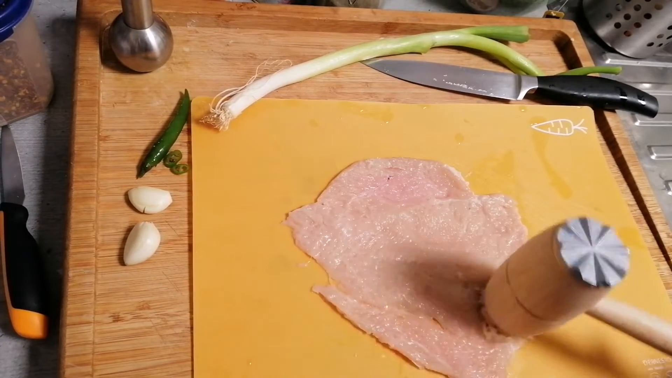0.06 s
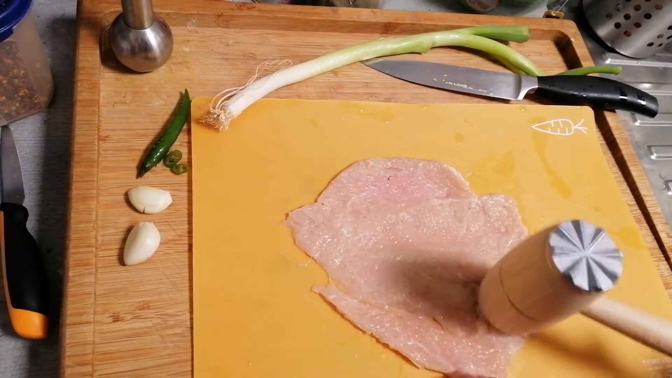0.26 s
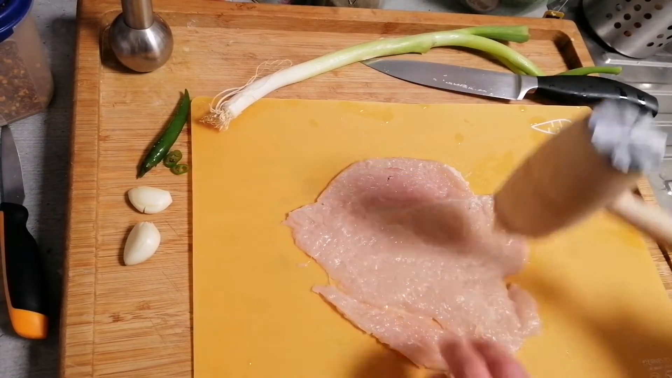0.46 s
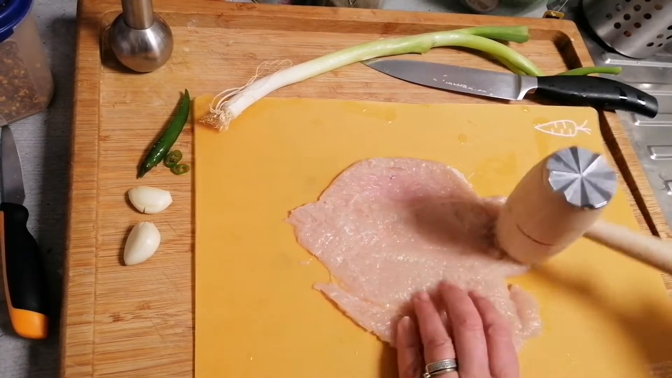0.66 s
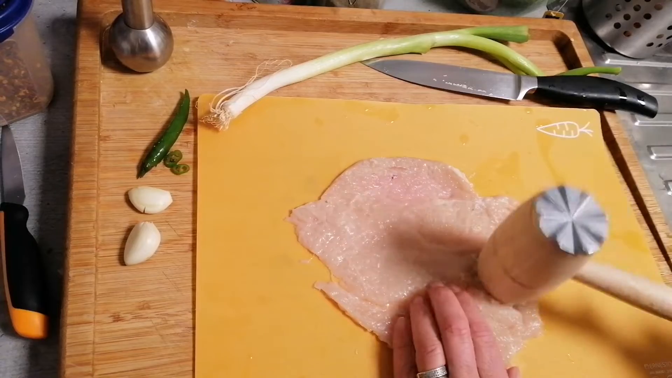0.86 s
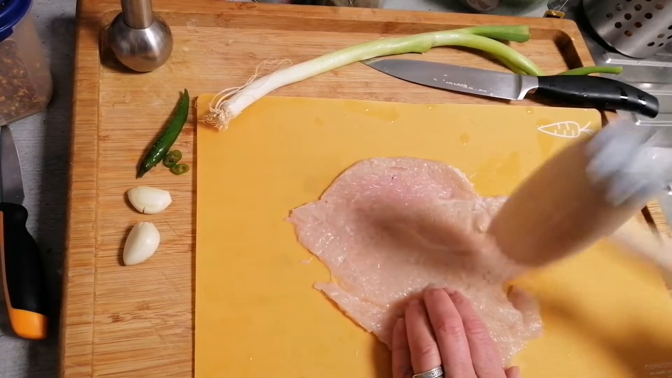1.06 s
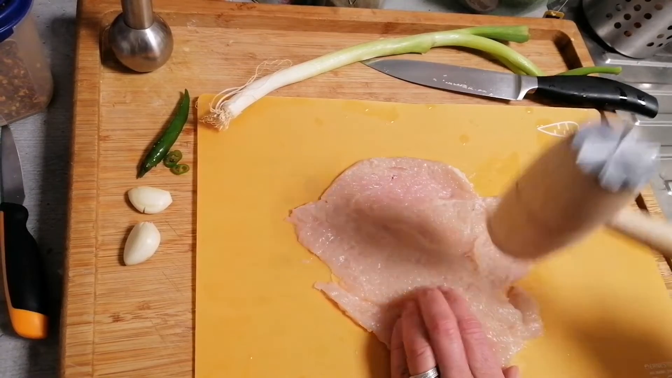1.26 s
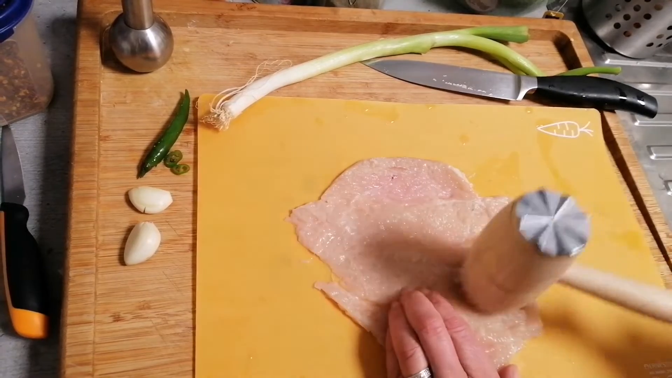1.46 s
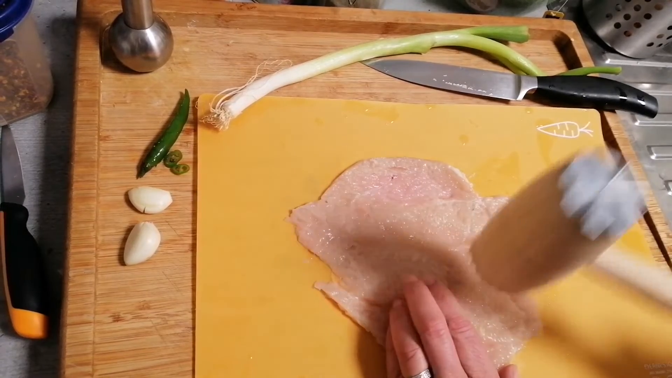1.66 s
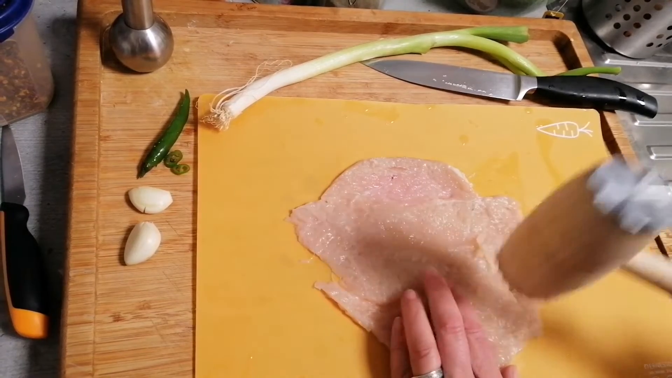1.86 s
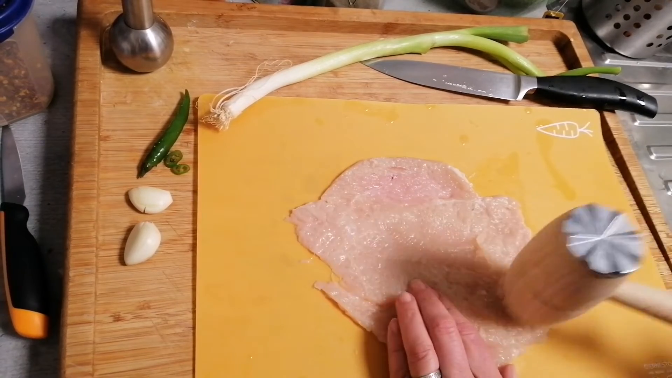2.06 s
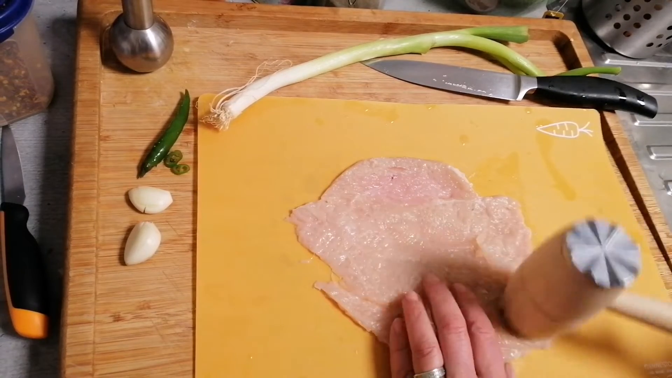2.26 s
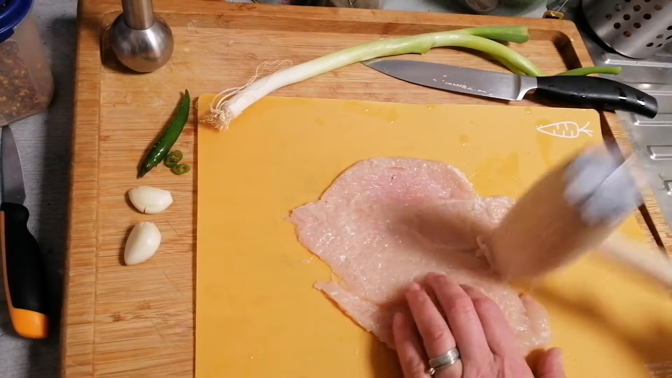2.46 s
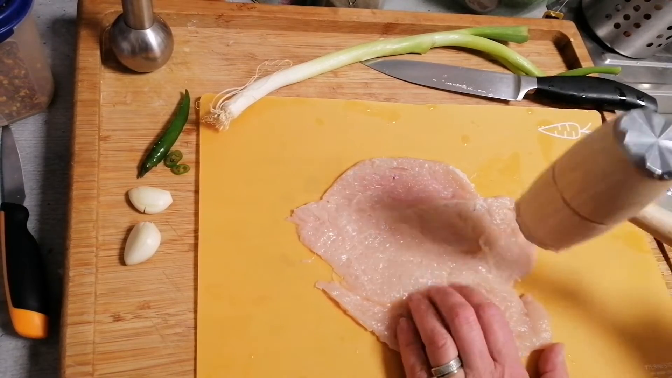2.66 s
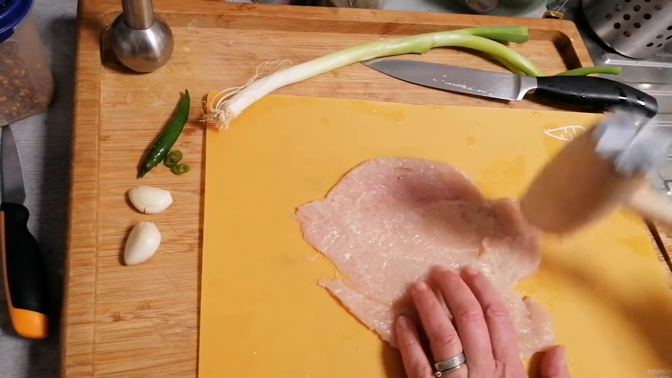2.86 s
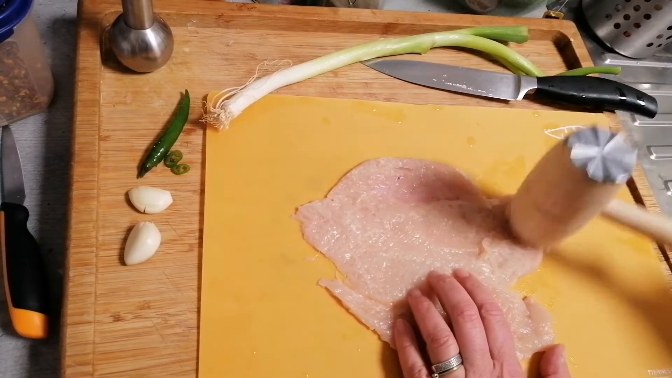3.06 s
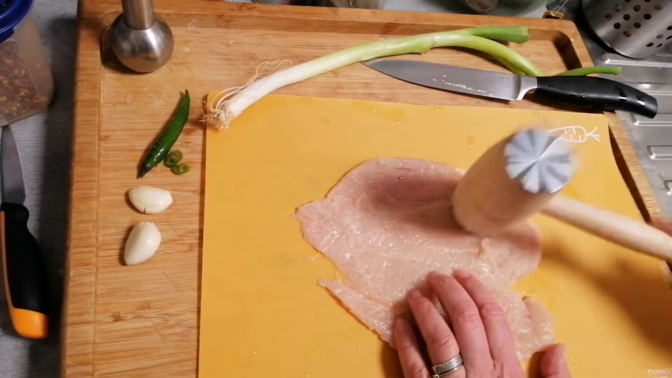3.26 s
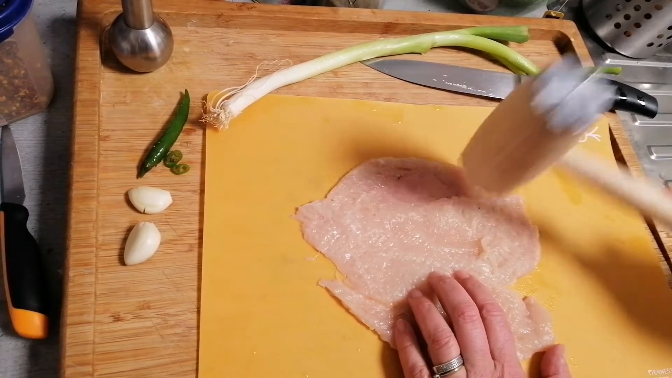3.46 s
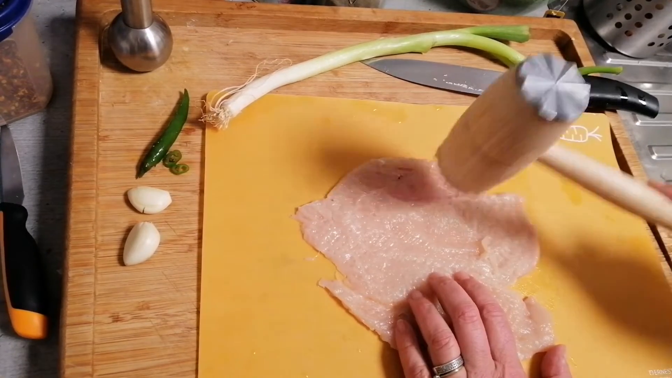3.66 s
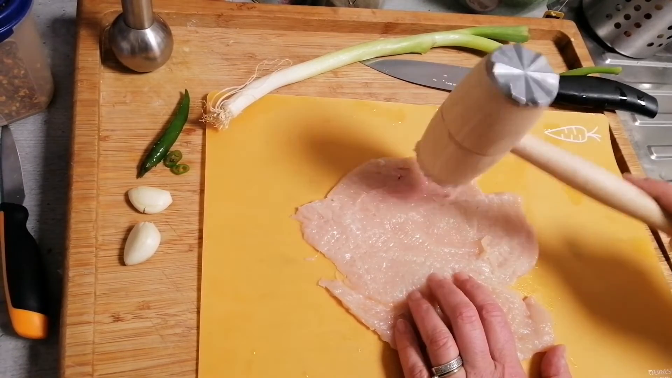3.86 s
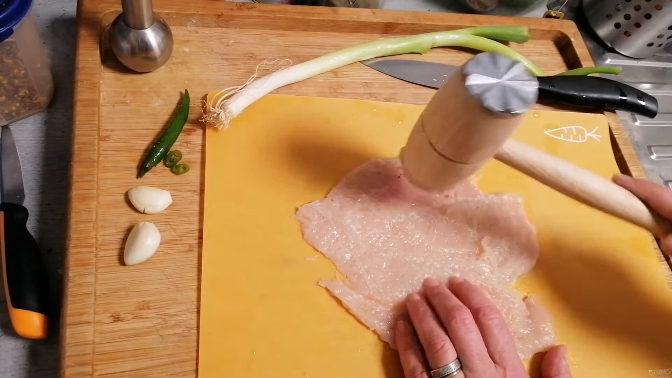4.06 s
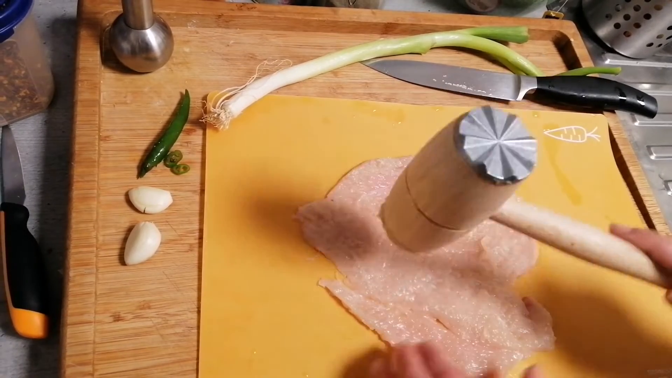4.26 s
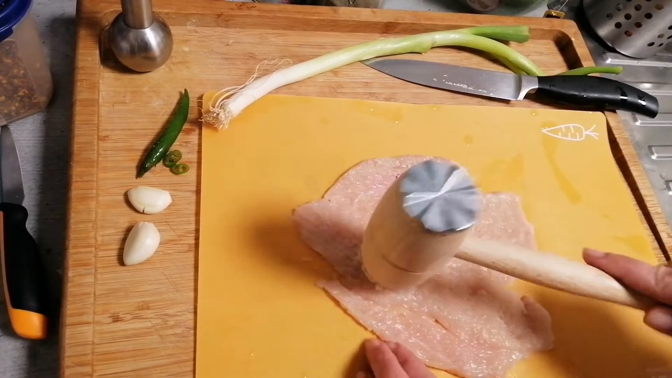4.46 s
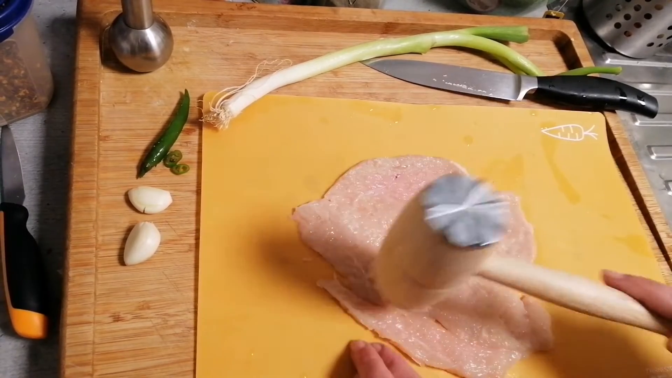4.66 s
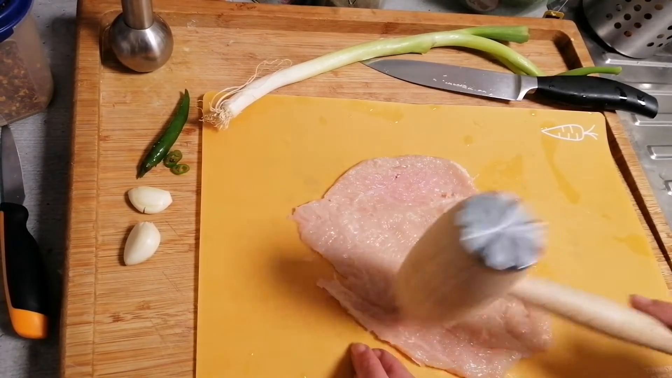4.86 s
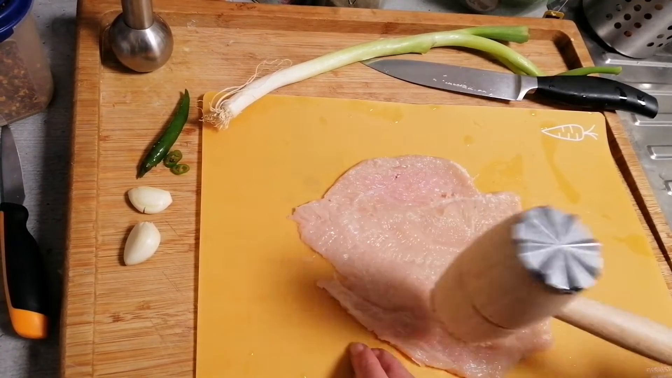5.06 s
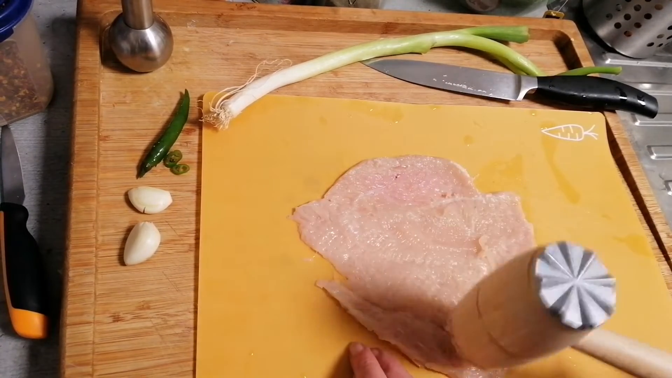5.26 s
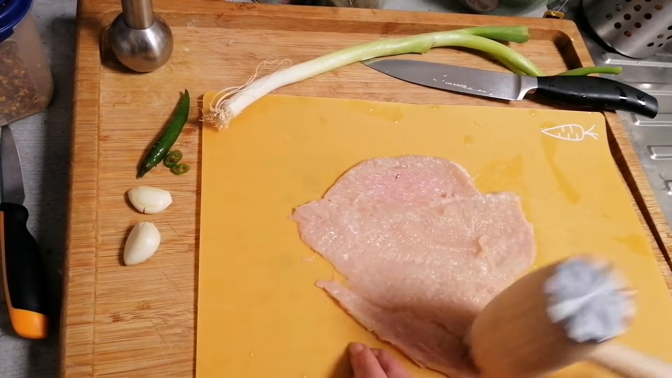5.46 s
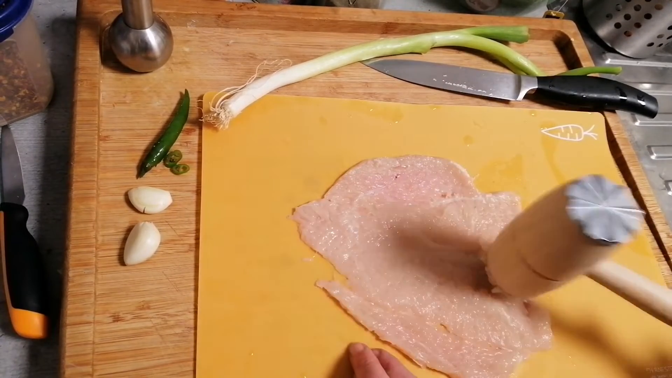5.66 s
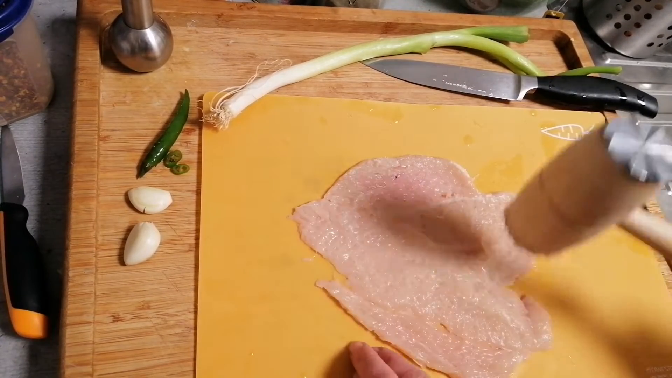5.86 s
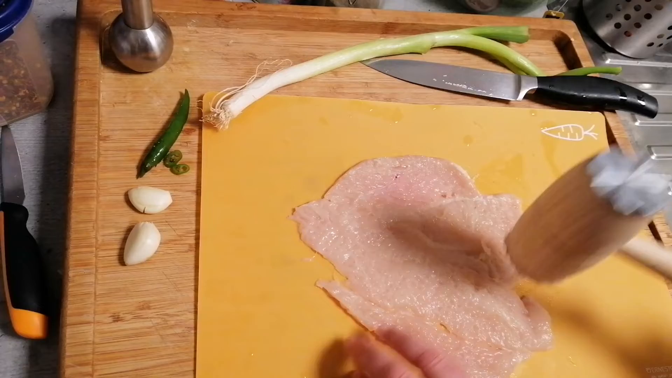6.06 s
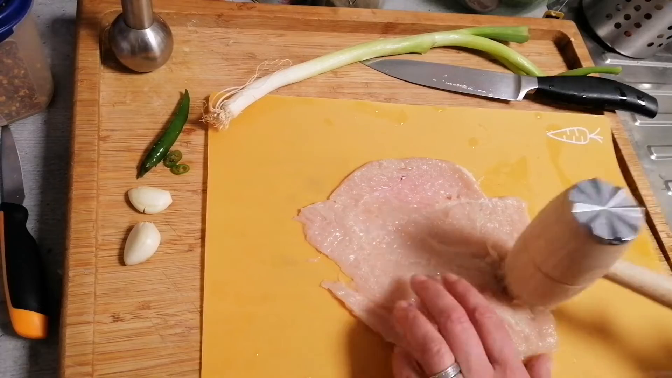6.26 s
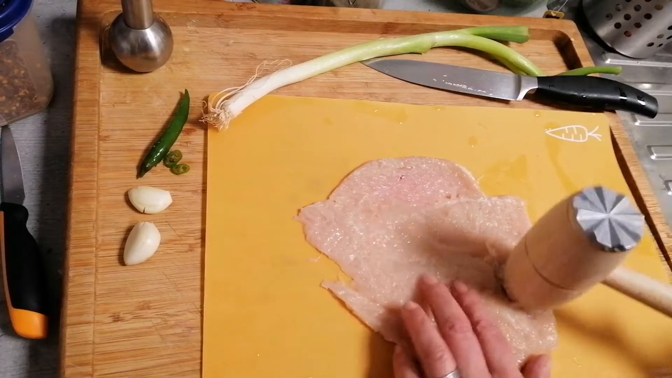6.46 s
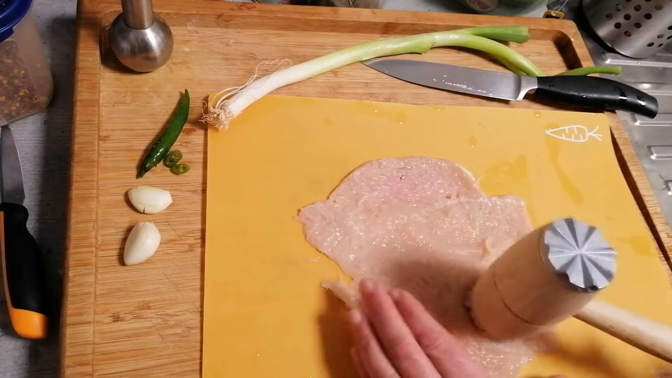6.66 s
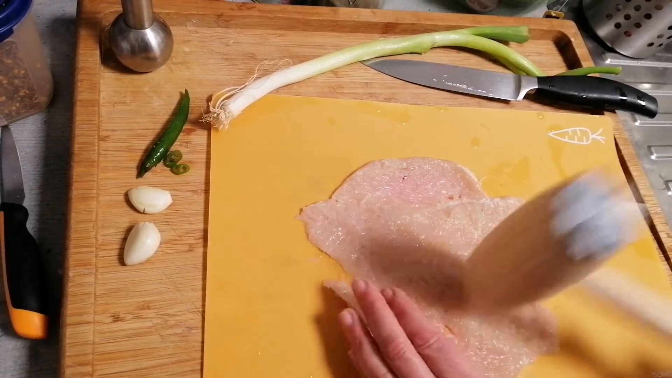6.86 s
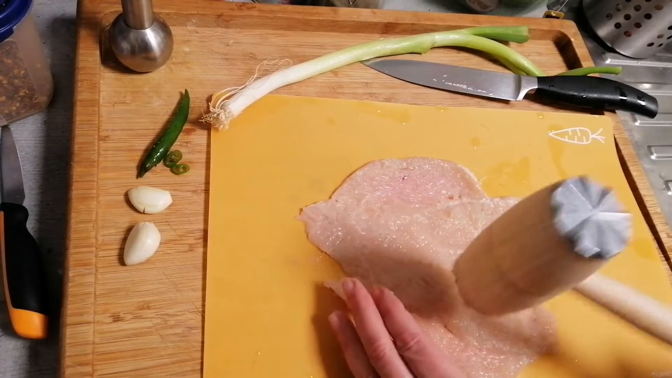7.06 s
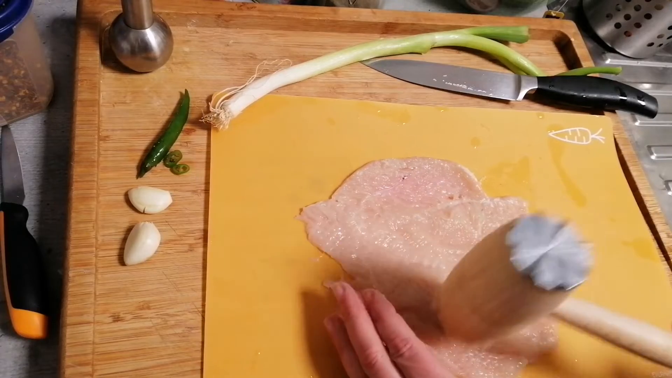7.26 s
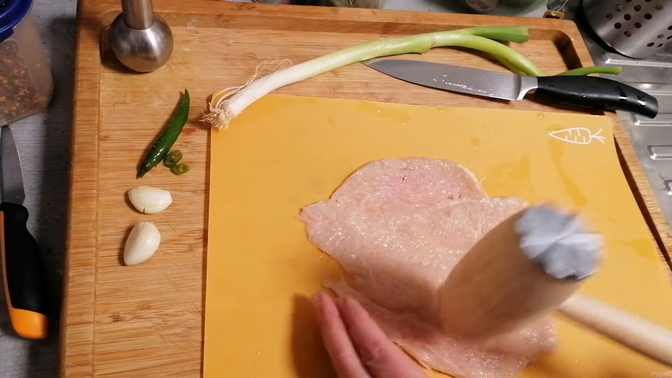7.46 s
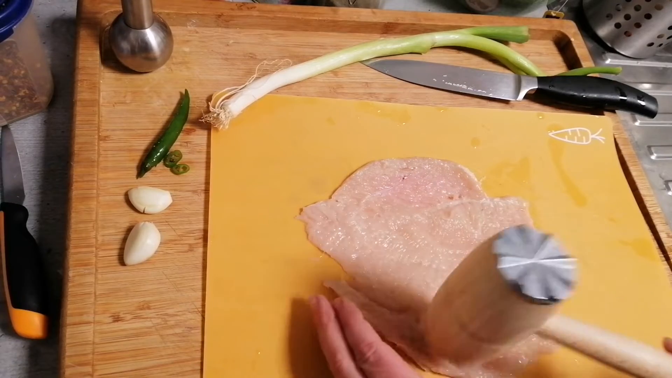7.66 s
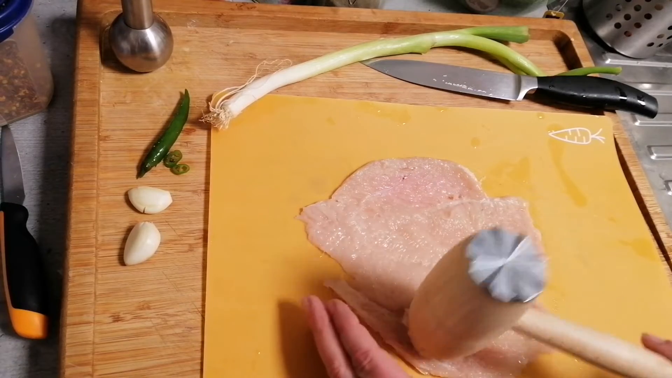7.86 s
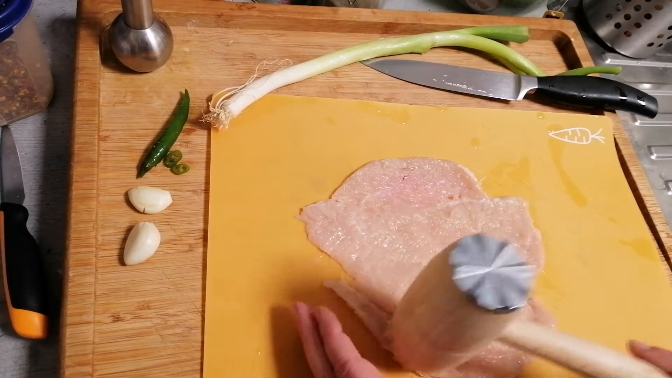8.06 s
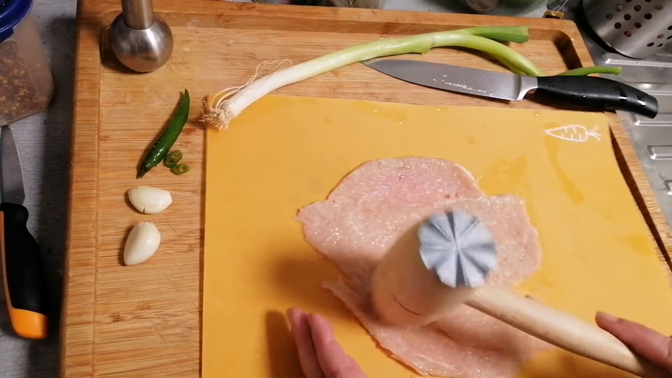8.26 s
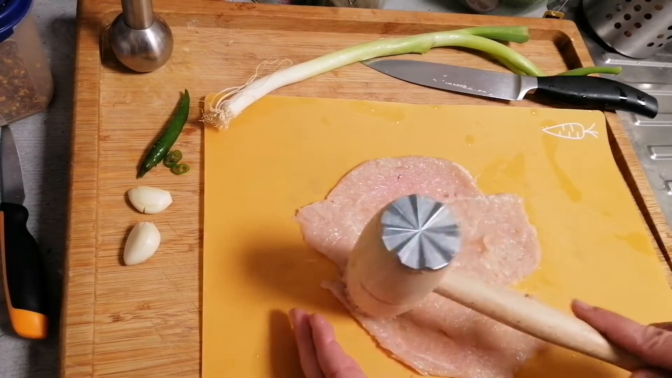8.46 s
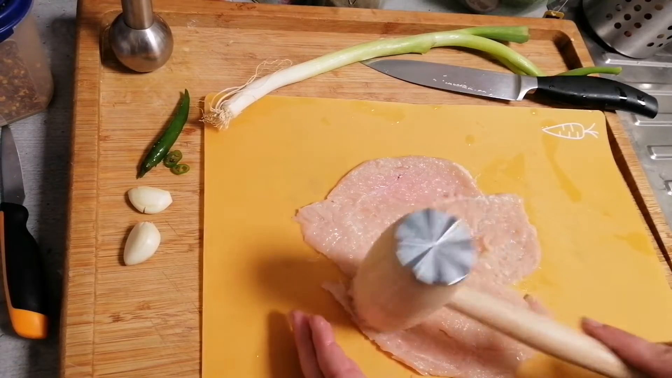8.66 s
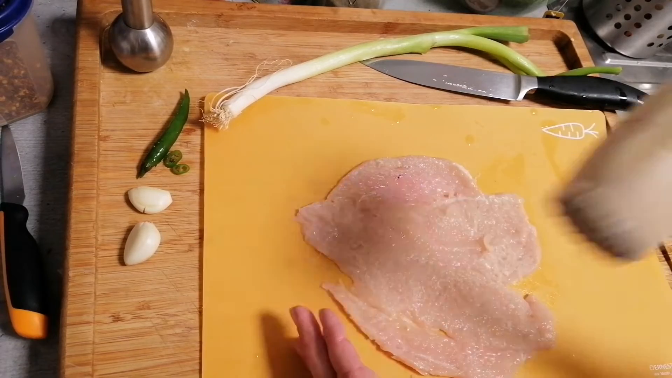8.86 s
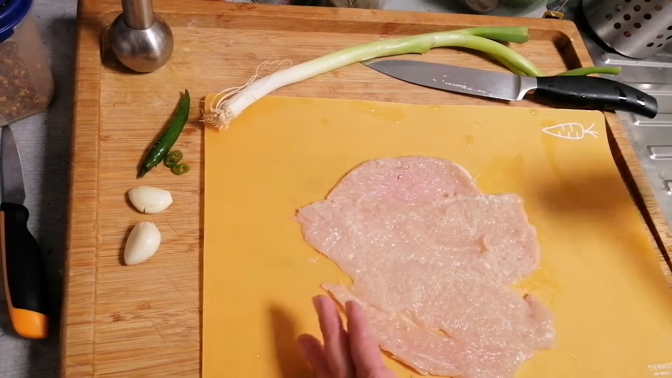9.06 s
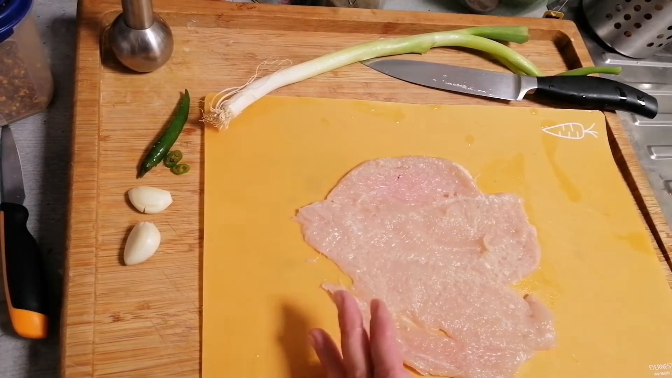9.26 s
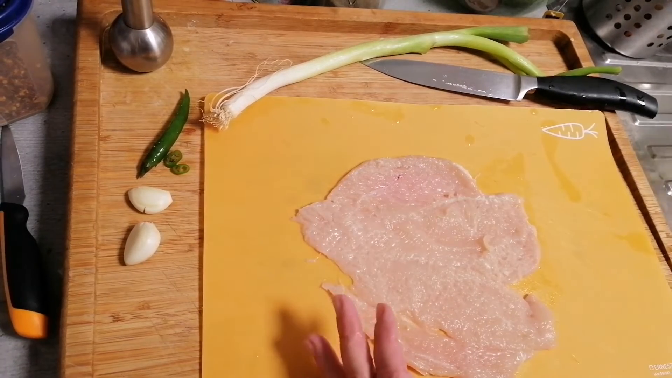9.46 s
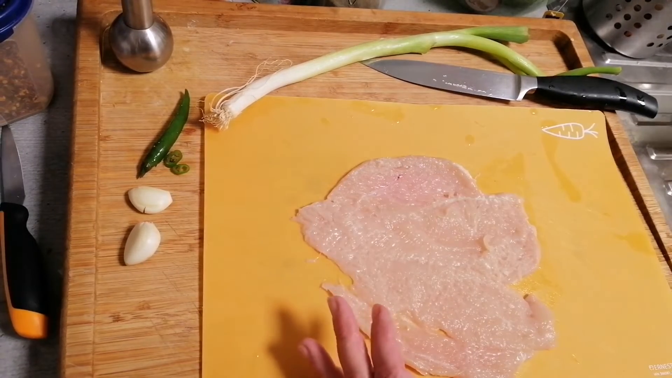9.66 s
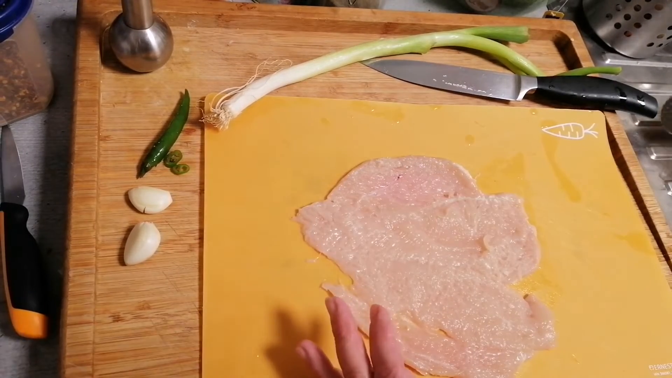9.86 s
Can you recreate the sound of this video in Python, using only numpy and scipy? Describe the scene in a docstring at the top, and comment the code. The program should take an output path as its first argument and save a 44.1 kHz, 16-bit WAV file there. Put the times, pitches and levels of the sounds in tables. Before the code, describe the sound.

The fading tail of an earlier blow opens, then a wooden mallet pounds raw meat on a plastic mat over a wooden board, about four to five blows per second. Each is a wet slap with a hollow pop, a deep short thud and a small sticky tick as the mallet lifts. After the last blow, fingertips faintly rub the mat. Close stereo microphones, leaning right, in a small reflective kitchen with faint hiss and hum.

```python
"""A wooden mallet pounds a chicken breast on a plastic mat over a wooden board in a small kitchen.
At the opening the board and room still carry an earlier blow, as decaying modes and filtered noise.
Then each blow is a noise-burst slap with a hollow pop of trapped air, over modal thuds of board and room.
After each blow the mallet peels off with a small sticky tick; at the end fingers slide over the mat.
Wall echoes follow the contact sounds; faint hiss and an appliance hum run throughout."""
import sys
import numpy as np
from scipy import signal
from scipy.fft import rfft, irfft, next_fast_len
from scipy.io import wavfile

SR = 44100
rng = np.random.default_rng(int(sys.argv[2]) if len(sys.argv) > 2 else 0)


def unload_wav(signal):
    """Save mono or channel-first audio to the path in sys.argv[1] as 16-bit WAV at rate SR, clipped to [-1, 1]."""
    wavfile.write(
        sys.argv[1],
        SR,
        np.round(np.clip(np.atleast_2d(signal).T, -1, 1) * 32767).astype(np.int16),
    )


N = 437897
T = np.arange(N) / SR

# mallet blows, levels relative to a usual blow:
# start_s, force_db, trapped_air_db, juice_db, fine_spray_db, squirt_hz
BLOWS = [(0.122, -2, -5, -5.5, 0.0, 6500), (0.333, 2, -2, -3.5, -6, 2510),
         (0.697, -3.5, 5, 1.5, -3.5, 2150.0), (0.955, 1.5, -1.5, 2, -2, 2280),
         (1.198, 5, 12.5, 8.5, 1.5, 2500), (1.511, 0, 2.5, 4, 1, 7840), (1.777, 1.5, 6, 8, 3, 2400),
         (2.044, 1, 6.5, 10, 6, 4000), (2.293, 4.0, 2.0, -3, -1.5, 4900), (2.567, -1.5, 8, 3, -4.0, 3650),
         (2.823, -0.5, 6, 1.5, -4.5, 3340), (3.083, 1.5, 7.5, -5.5, -1.5, 6600),
         (3.359, -1, 4, 5.5, -1.0, 5950.0), (3.586, -2, 1.5, 0, 0.5, 5770),
         (3.813, -4, 8, -1.5, -0.5, 2090.0), (4.021, -3, -0.5, 4.5, 5, 3770),
         (4.437, 1.5, 4, 1.5, 2.5, 5800), (4.619, 1, 3.5, 0, 4, 5700), (4.816, 0, -3.5, -2, -4.5, 5400),
         (5.016, -4, -12, 0.5, 1, 7050), (5.207, -3.5, 2, 10.5, 5, 6940), (5.389, -7, 4, 1.0, 6, 6580.0),
         (5.574, -2, 1, -4.5, -3, 5400), (5.779, -6, -1.5, -4, -7, 4180), (6.038, -2.0, 6.5, 3.5, -4, 2100),
         (6.273, 1, 3.5, -1, -4.5, 6900), (6.488, 2.5, -3, -6, -7.5, 3800.0),
         (6.741, 1, -2.5, -7, -1, 3290.0), (6.992, 0.5, 4, 3, 5, 2600), (7.218, 1, -6, -4.5, -4, 7040.0),
         (7.429, 0, -4.5, 0.5, -1.5, 7660.0), (7.646, 1.5, -4, 1.5, 2, 5300),
         (7.858, -0.5, -1, 0.5, 7.5, 5150.0), (8.069, -3, 0.5, -3.5, -6.5, 7400),
         (8.304, -1.5, -3, 2, -2, 4870), (8.494, -0.5, -1.5, 2, -4, 2690), (8.697, -0.5, 5, 5.5, 6, 7400)]
# modes of board and worktop: pitch_hz, level_db, t60_s, first_swing_sign
BOARD = [(46.18, -16, 1, -1), (66.46, -11, 0.78, 1), (91.5, -5, 0.17, 1), (131.3, 2, 0.32, -1),
         (192.5, -12.5, 0.3, -1), (242.7, -15.5, 0.17, 1), (289, -20.5, 0.26, -1), (352.8, -31, 0.1103, 1),
         (424.4, -30.5, 0.073, -1)]
# standing waves of the kitchen: pitch_hz, level_db, t60_s, first_swing_sign
BOOM = [(42.6, -10.5, 0.6, -1), (58.5, -7.5, 0.24, 1), (74.43, -20.5, 0.79, 1), (125.8, -22.5, 0.21, 1),
        (144.6, -8, 0.31, -1), (222.8, -8, 0.17, -1)]
# ways in which the sound leaves the mallet: left microphone, right microphone, then four walls
WAYS = 6


def amp(db):
    """Decibel law: level to amplitude gain."""
    return 10 ** (np.asarray(db) / 20)


def unit(x):
    """Energy normalisation: the squares sum to one."""
    return x / np.sqrt(np.sum(x ** 2, axis=-1, keepdims=True) + 1e-20)


def add(out, s, sound):
    """Superposition: mixes a sound in at time s."""
    i = max(round(s * SR), 0)
    out[..., i:i + sound.shape[-1]] += sound[..., :N - i]


def band(x, low_hz, high_hz):
    """Band-pass filtering: keeps the range between two cutoffs."""
    edges = np.clip([low_hz, high_hz], 10, .45 * SR)
    return signal.sosfilt(signal.butter(2, edges, "band", fs=SR, output="sos"), x)


def resonance(x, hz, width_hz):
    """Damped resonance: a pole pair makes one peak, wider with more damping."""
    r = np.exp(-np.pi * width_hz / SR)
    return signal.lfilter([1, 0, -1], [1, -2 * r * np.cos(2 * np.pi * hz / SR), r * r], x)


def fade(t, t60):
    """Exponential decay: falls by 60 dB in t60 seconds."""
    return amp(-60 * t / t60)


def colour(x, points, power=1):
    """Spectral shaping: filters by a (Hz, dB) curve raised to a power."""
    size = next_fast_len(x.shape[-1] + SR // 50)
    hz, db = np.transpose(points)
    bins_hz = np.arange(size // 2 + 1) * SR / size
    curve = np.interp(np.log(bins_hz + 1), np.log(hz), db)
    return irfft(rfft(x, size) * amp(curve * power), size)[..., :x.shape[-1]]


def pan(x, points):
    """Interchannel level difference: leans each frequency left or right."""
    return colour(x, points, np.array([[.5], [-.5]]))


def crush(t, peak_s, rise_s, fall_s, grain_db=-0.5, ooze_db=-23.0, ooze_s=0.0085):
    """Noise burst of tiny wet pockets: exponential rise, two-stage decay, independent in each way."""
    before = np.minimum(t - peak_s, 0)
    since = np.maximum(t - peak_s, 0)
    decay = np.exp(-since / fall_s) + amp(ooze_db) * np.exp(-since / ooze_s)
    shape = np.exp(before / rise_s) * decay
    noise = rng.standard_normal((WAYS, len(t)))
    grain = amp(grain_db * rng.standard_normal((WAYS, len(t))))
    return shape * noise * grain


def hardness(force, air):
    """Impact hardness: dB relative to a usual blow; a forceful blow on a thin spot is a hard one."""
    per_force, per_air = 1.9, 0.23   # dB per dB
    return per_force * force + per_air * air


def slaps(pop_db=-18.5, bump_db=-33.0, lead_s=.003, peak_s=.0037):
    """Impact on a wet layer: trapped air pops, the meat smacks, juice squirts and the mallet head rings."""
    out, t = np.zeros((WAYS, N)), T[:SR // 10]
    for s, force, air, juice, spray, squirt_hz in BLOWS:
        pocket_spread_octaves = .09   # the air pocket is about the same size on every blow
        pocket_hz = 1154.6 * 2 ** (pocket_spread_octaves * rng.normal())
        push = crush(t, peak_s, rise_s=0.00024, fall_s=0.0015, grain_db=4.0, ooze_db=-24.5)
        bump = crush(t, peak_s, rise_s=0.00055, fall_s=0.0051)
        # long waves reach both microphones alike
        push[0], bump[0] = push[1], bump[1]
        sound = amp(pop_db + air) * hollow_pop(t, push, pocket_hz)
        # a hard blow bumps through to the mat
        sound += amp(bump_db + hardness(force, air)) * unit(band(bump, 200, 410))
        sound += wet_burst(t, peak_s, force, air, juice, spray, squirt_hz)
        add(out, s - lead_s, sound)
        add(out[:2], s, mallet_ring(t, force, air))
    return out


def hollow_pop(t, push, pocket_hz, pocket_share=0.82):
    """Cavity resonance: escaping air is coloured noise plus the ringing of the pocket."""
    # hollow colour of the escaping air: pitch_hz, level_db
    pop_curve = [(150, -28), (380, -19), (540, -12.5), (760, -3), (1150, 2), (1500, -2), (2200, -6),
                 (4000, -39)]
    return unit(unit(colour(push, pop_curve)) + pocket_share * gulp(t, pocket_hz))


def gulp(t, hz, start_s=.0018, above_octaves=.3):
    """Damped oscillation of an opening cavity: a short ring that glides down through its pitch."""
    sag_octaves, sag_s, ring_s = 1, .008, 0.0014
    t = np.maximum(t - start_s, 0)
    pitch = hz * 2 ** (above_octaves - sag_octaves * (1 - np.exp(-t / sag_s)))
    phase = 2 * np.pi * np.cumsum(pitch) / SR
    return unit(np.sin(phase) * t * np.exp(-t / ring_s))


def wet_burst(t, peak_s, force, air, juice, spray, squirt_hz, smack_db=-10.5, squelch_db=-11.5,
              spray_db=-19.0, squirt_share=0.21, squirt_width_hz=600):
    """Turbulent ejection: broadband noise with a resonant squirt, as juice and air leave the rim."""
    smack_per_air, smack_per_juice = 0.46, 0.53   # dB per dB
    # force draws the burst out, juice makes it snappier (dB of duration per dB)
    stretch_per_force, stretch_per_juice = .45, -.5
    burst_s = 0.0018 * amp(stretch_per_force * force + stretch_per_juice * juice)
    burst = crush(t, peak_s, rise_s=0.66 * burst_s, fall_s=burst_s, ooze_db=-16.0, ooze_s=.008)
    squirt = unit(resonance(burst, squirt_hz, squirt_width_hz))
    wet = unit(burst) + squirt_share * squirt
    # flat meat smacks low, juice squelches higher, the finest spray hisses on top
    smack = smack_db + smack_per_air * air + smack_per_juice * juice
    squelch, mist = squelch_db + juice, spray_db + spray
    return colour(wet, [(600, smack - 24), (1750, smack - 1), (3200, smack),
                        (5000, squelch), (7600, squelch + 1), (8700, mist),
                        (10000, mist - 1), (12000, mist - 6), (15000, mist - 11)])


def mallet_ring(t, force, air, wood_db=-25.0, per_hardness=0.3, per_air=.6, scatter_db=3.4):
    """Modal vibration: the wooden head rings as a sum of decaying sines."""
    # modes of the mallet head: pitch_hz, level_db, t60_s
    head_modes = [(662, -9, 0.19), (827, 1.5, 0.063), (1140, -1, 0.049), (1820, -10.5, 0.037),
                  (2418, -5, 0.11)]
    wood = 0
    for hz, db, t60 in head_modes:
        level = amp(db + scatter_db * rng.normal())
        swing = rng.choice([-1, 1])
        wood = wood + level * swing * np.sin(2 * np.pi * hz * t) * fade(t, t60)
    return amp(wood_db + per_hardness * hardness(force, air) + per_air * air) * unit(wood)


def thuds(thud_db=-36.5, board_db=5.5, boom_db=5.5, bass_follow=.45, scatter_db=1.5, detune=0.012,
          contact_s=0.0013, boom_lag_s=.0294):
    """Modal excitation: blows ring the board, then the room; hardness drives upper modes, the lowest vary least."""
    out, t = np.zeros(N), T[:SR]
    # the soft meat rounds off the start of the swing
    onset = 1 - np.exp(-t / 0.0016)
    for s, force, air, *_ in BLOWS:
        for modes, lag, db in (BOARD, contact_s, board_db), (BOOM, boom_lag_s, boom_db):
            for hz, level, t60, swing in modes:
                drives = [bass_follow * force, force, hardness(force, air)]
                drive = np.interp(hz, [70, 125, 210], drives) + scatter_db * rng.normal()
                pitch = hz * (1 + detune * rng.normal())
                ring = np.sin(2 * np.pi * pitch * t) * fade(t, t60) * onset
                add(out, s + lag, swing * amp(thud_db + db + level + drive) * ring)
    return out


def peels(peel_db=-40.5, fizz_db=-53.5, fizz_s=0.043):
    """Adhesive release: a band of noise ticks as the face lifts, after a faint fizz of juice."""
    # stray ticks of the wet meat settling: peak_s, level_db
    stray_ticks = [(0.227, -40.5), (0.4533, -35.5), (2.477, -50.5), (4.417, -42), (6.1938, -51),
                   (8.926, -50), (9.087, -48)]
    lift_s, lift_spread_s = 0.076, 0.0043   # from landing to lifting
    # the face sticks more after a firm blow that traps little air (dB per dB)
    stick_per_force, stick_per_air = 0.97, -0.7
    out, t = np.zeros((WAYS, N)), T[:SR // 6]
    ticks = list(stray_ticks)
    for s, force, air, _, spray, _ in BLOWS:
        tick_s = s + lift_s + lift_spread_s * rng.normal()
        ticks.append((tick_s, peel_db + stick_per_force * force + stick_per_air * air))
        fizz = crush(t, fizz_s + .008 * rng.normal(), rise_s=0.056, fall_s=0.013)
        add(out, s, amp(fizz_db + spray) * unit(band(fizz, 6500, 15500)))
    for s, db in ticks:
        tick = crush(t, 0.0086, rise_s=.003, fall_s=0.0036)
        add(out, s - .008, amp(db) * unit(band(tick, 5100, 7800)))
    return out


def fingers(grain_db=6.5):
    """Friction noise: damp fingertips rub the mat as grainy noise under bell-shaped swells."""
    # slides, length from the peak to 1/e: peak_s, length_s, level_db
    slides = [(8.949, 0.048, -78.5), (9.196, 0.048, -74.5), (9.416, 0.052, -80)]
    grains = rng.standard_normal(N) * amp(grain_db * rng.standard_normal(N))
    rub = colour(grains, [(200, -8.0), (600, -3), (1500, 3.5), (7000, 0.5), (14000, -22)])
    rub = unit(rub) * np.sqrt(N)
    return rub * sum(amp(db) * np.exp(-((T - s) / length) ** 2) for s, length, db in slides)


def dying_thud(level_db=-37.0, age_s=0.068):
    """Free modal decay: board and room still ring from an earlier blow as the scene opens."""
    t = T[:SR] + age_s
    ring = 0
    for hz, db, t60, swing in BOARD + BOOM:
        # the decay counts from half the age
        ring = ring + swing * amp(db) * np.sin(2 * np.pi * hz * t) * fade(t - age_s / 2, t60)
    opening = np.minimum(T[:SR] / .004, 1) ** 2
    return np.pad(amp(level_db) * ring * opening, (0, N - SR))


def dying_slap(level_db=-27.0, t60=0.2):
    """Reverberant decay: the room still carries the slap of that earlier blow as fading noise."""
    t = T[:SR // 2]
    opening = np.minimum(t / .004, 1) ** 2
    noise = rng.standard_normal((2, len(t)))
    tail = colour(noise, [(300, 14), (1200, 7.5), (6000, -2.5), (14000, -18)]) * fade(t, t60) * opening
    return np.pad(amp(level_db) * unit(tail), ((0, 0), (0, N - len(t))))


def kitchen(sources, early_db=-3.5, early_t60=0.035, late_db=-4.5, late_t60=0.28, gap_s=0.0053):
    """Reverberation by convolution: each wall answers with dense early echoes, then a short tail."""
    # colour of the room's echoes: pitch_hz, level_db
    echo_curve = [(150, -4.5), (350, 14.5), (600, 9), (1200, -3.5), (2500, 0.5), (4000, -3), (7000, -6),
                  (10000, -2), (14000, -9)]
    t, out = T[:SR // 2], 0
    for source in sources:
        grains = rng.standard_normal((2, len(t))) * amp(1.0 * rng.standard_normal(len(t)))
        early = unit(grains * fade(t, early_t60) * (t > gap_s))
        late = unit(rng.standard_normal((2, len(t))) * fade(t, late_t60) * (t > 2 * gap_s))
        echoes = colour(amp(early_db) * early + amp(late_db) * late, echo_curve)
        out = out + signal.oaconvolve(source[None], echoes, axes=1)[:, :N]
    return out / np.sqrt(len(sources))


def still_air(hiss_db=-77.0, hum_db=-79, hum_hz=144):
    """Stationary background: partly correlated stereo noise and the sine hum of an appliance."""
    # spectrum of the still kitchen: pitch_hz, density_db_per_hz
    air_curve = [(18, -42), (30, -9), (92, -9), (143, -3.5), (190, -8.5), (320, -10), (497, -14.5),
                 (1270, -25), (2250, -22), (4780, -32), (5730, -27.5), (8470, -38.5), (15000, -52)]
    noise = rng.standard_normal((2, N)) + rng.standard_normal(N)   # own part plus shared part
    hiss = amp(hiss_db) * unit(colour(noise, air_curve)) * np.sqrt(N)
    return hiss + amp(hum_db) * np.sqrt(2) * np.sin(2 * np.pi * hum_hz * T)


def scene():
    """Superposition of direct and reverberant fields: contact sounds and thuds, echoes and quiet."""
    # direct sound, left minus right; the mallet works nearer to the right: pitch_hz, difference_db
    direct_lean = [(100, -5), (500, -9), (1000, -7.5), (1500, -6), (2500, -9.5), (4500, -11), (7200, -5.5),
                   (9300, -2.5), (14000, 2.5)]
    # room sound, left minus right: pitch_hz, difference_db
    room_lean = [(100, -6.5), (500, -8.5), (1500, -4.5), (4000, -6.5), (7000, -11.5), (8800, 3),
                 (14000, -1.5)]
    contact = slaps() + peels() + fingers()
    direct = contact[:2] + thuds() + dying_thud()
    room = kitchen(contact[2:]) + dying_slap() + still_air()
    return pan(direct, direct_lean) + pan(room, room_lean)


def record(dry):
    """Band limiting: the deepest bass and the top are cut."""
    cutoff_hz = 15500
    dry = colour(dry, [(20, -22.5), (30, -12.5), (40, -0.5)])
    return signal.sosfilt(signal.ellip(10, .1, 80, cutoff_hz, fs=SR, output="sos"), dry)


dry = scene()
out = record(dry)
unload_wav(out)
```